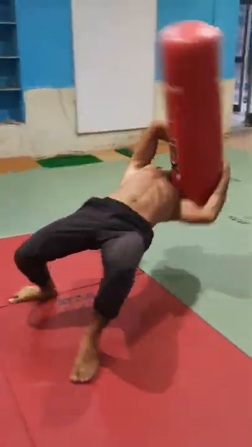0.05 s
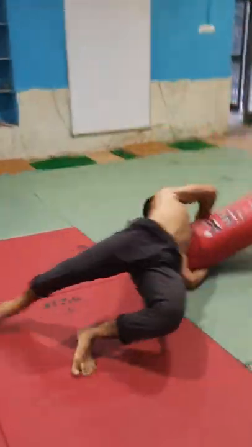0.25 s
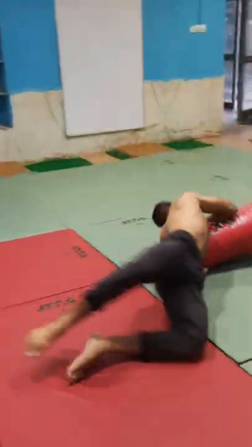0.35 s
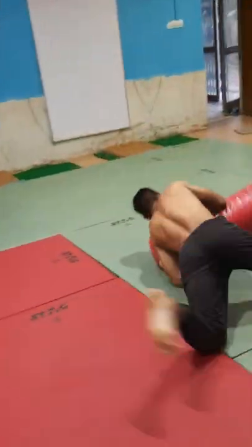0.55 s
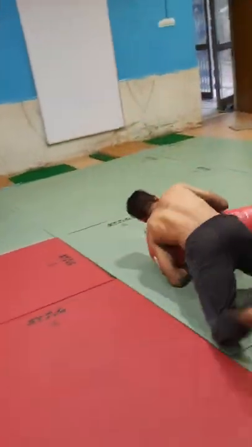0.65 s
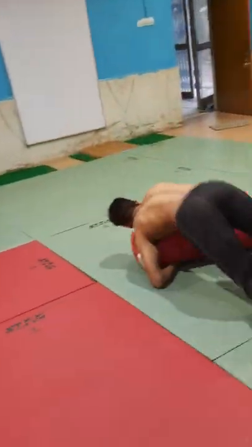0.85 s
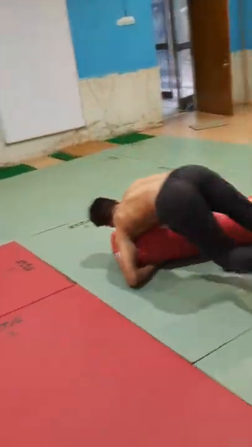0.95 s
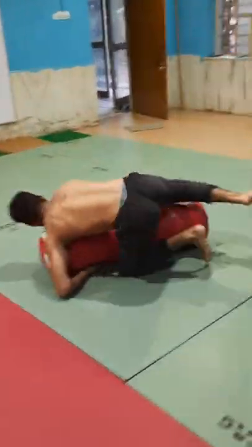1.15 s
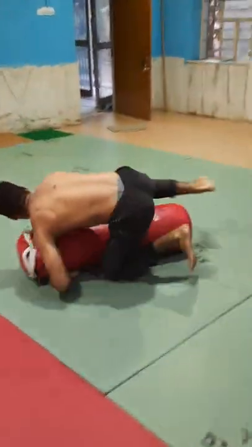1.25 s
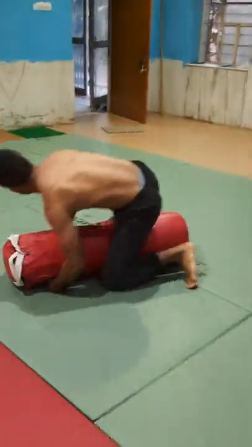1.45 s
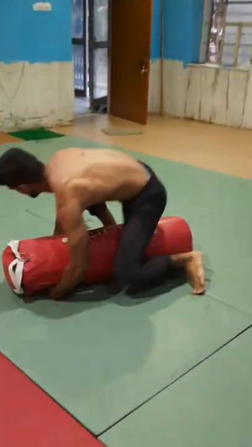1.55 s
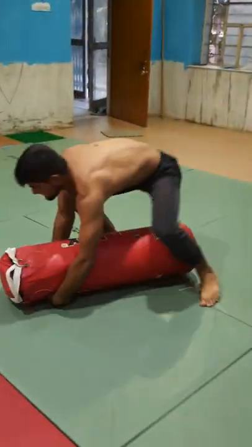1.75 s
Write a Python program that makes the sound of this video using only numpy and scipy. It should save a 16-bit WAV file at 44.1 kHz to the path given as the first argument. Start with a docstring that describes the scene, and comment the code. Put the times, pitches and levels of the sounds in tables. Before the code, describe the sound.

A heavy vinyl bag and body slam onto padded mats, booming through an echoing gym

```python
"""Bag and body landing on gym mats

A wrestler throws a heavy vinyl bag onto padded mats and lands with it, in a bare, echoing gym.
Thuds are pressure pulses with damped ringing; slaps and scuffs are shaped, coloured noise; cracks are spikes.
Decaying sines form the low resonances that boom on, and random reflections form the echo.
Knees and feet then knock and scuff on the mat as he rolls over the bag, above steady room noise."""
import sys
import numpy as np
from scipy import signal
from scipy.fft import rfft, irfft
from scipy.io import wavfile

SR = 44100
rng = np.random.default_rng(int(sys.argv[2]) if len(sys.argv) > 2 else 0)


def bounce(signal):
    """Save signal as a 16-bit WAV file at the path given by the first command-line argument."""
    frames = np.transpose(np.atleast_2d(signal))
    limited = np.clip(frames, -1, 1)
    pcm = np.round(limited * 32767).astype(np.int16)
    wavfile.write(sys.argv[1], SR, pcm)


N = 79380
TIME = np.arange(N) / SR  # s
HZ = np.fft.rfftfreq(2 * N, 1 / SR)

# Blows on the mat. Each row: pulse centre in seconds, relative level in dB, nominal pitch in Hz,
# ring level in dB relative to the pulse.
BLOWS = [(0.2349, -13.5, 280, -10.5), (0.2744, -7.5, 274, -5), (.290, -8, 284, -3), (0.3, -10, 127, -26),
         (0.327, -10, 199, -11), (.3375, -2, 187.4, -10), (.357, -8.5, 254, -8), (.398, -10, 181.5, -9),
         (.410, -14, 103, -36), (.446, -12, 206, -9), (.698, -16, 221, -13.5), (.708, -13, 192.3, -10),
         (0.861, -19, 148, -19), (0.875, -17, 209, -11.5), (0.928, -22, 65.6, -16), (1.127, -34, 64, -10.5),
         (1.355, -29, 138, -22), (1.402, -31, 197, -7), (1.574, -28.5, 166, -1), (1.600, -27.5, 393, -13)]
THUD_CYCLES = 0.38  # pulse width in periods of the nominal pitch
THUD_RING_S, THUD_RING_RATIO = 0.012, 1.195  # decay; ring frequency over nominal pitch
THUD_EARLY_DB, THUD_ROOM_DB = -8, -5

# Bass resonances of the room. Each row: frequency in Hz, relative level in dB, 60 dB decay time in seconds.
ROOM_MODES = [(50.75, -35.1, 2.99), (59.51, -23.9, 5.0), (61.95, -29.8, 2.48), (67.43, -30.3, 3.0),
              (71.05, -28.1, 4.83), (78.19, -25.8, 3.58), (82.96, -34.8, 3.25), (88.02, -23.2, 3.24),
              (90.86, -30.6, 2.9), (101.18, -23.9, 2.37), (110.12, -25.1, 3.43), (114.04, -28.4, 2.2),
              (119.95, -28.5, 2.32), (135.81, -33.4, 2.17)]
LANDING_S, BOOM_RISE_S, BOOM_DB = 0.3375, 0.025, 1

# Vinyl and skin slapping the mat. Each row: start in seconds, relative level in dB, decay in seconds,
# treble tilt in dB per octave.
SLAP_EVENTS = [(0.2705, -25, 0.0088, 9.5), (0.285, -23.5, 0.013, -4), (.304, -22, 0.02, -4),
               (.325, -14, 0.0018, 0.5), (0.336, -20.5, 0.021, -2.5), (0.355, -20, 0.013, 0),
               (0.369, -17.5, .011, -0.44), (.381, -17.5, 0.0049, -1.8), (.394, -21.5, 0.021, -2),
               (.6935, -27, 0.0035, 8.5)]
# Spectrum of a slap before its tilt. Each row: frequency in Hz, relative level in dB.
SLAP_SPECTRUM = [(80, -29), (300, -0.5), (480, 5.5), (650, -4), (900, 0.5), (1150, -2.5), (1400, -1.5),
                 (2200, -1), (2750, -9), (3600, -5), (4900, -8.5), (8500, -15), (9800, -19.5),
                 (16000, -17.5)]
SLAP_RISE_S, SLAP_GRAIN_DB = 0.00085, 4
SLAP_DIRECT_DB, SLAP_EARLY_DB, SLAP_ROOM_DB = 1, -1, 2.5

# Flat surfaces trapping air with a sharp crack. Each row: start in seconds, relative level in dB,
# width in seconds.
AIR_CRACKS = [(.3265, -5, .00016), (.3823, -8, .00009)]
CRACK_EARLY_DB = -6

# Cloth, skin and bag sliding. Each row: start in seconds, rise in seconds, decay in seconds,
# relative level in dB, treble tilt in dB per octave.
SLIDES = [(.11, 0.051, 0.21, -42, -1.5), (0.243, 0.018, 0.068, -30.5, -0.5), (.325, 0.034, 0.037, -36, 6.5),
          (0.691, 0.028, 0.047, -35.5, -1.5), (0.859, 0.032, 0.016, -48.5, 3),
          (1.121, 0.05, 0.021, -64, 15), (1.54, 0.018, 0.22, -44.5, -5)]
# Spectrum of a scuff before its tilt. Each row: frequency in Hz, relative level in dB.
SCUFF_SPECTRUM = [(80, -12), (300, -7.5), (700, 9), (2200, 1.5), (4500, -3.5), (8600, -2), (9600, -6.5),
                  (13000, 0), (16000, -13)]
SCUFF_GRAIN_DB, SCUFF_LEFT_DB = 1.1, 1
SCUFF_DIRECT_DB, SCUFF_ROOM_DB = -1.5, 3

# Reverberation time of the gym. Each row: frequency in Hz, 60 dB decay time in seconds.
REVERB_TIME = [(60, 1.14), (150, 0.94), (300, 1.2), (700, 1.91), (2000, 1.81), (4000, 1.29), (8000, 1.03),
               (15000, 0.38)]
# Left-right likeness of diffuse sound. Each row: frequency in Hz, correlation from -1 to 1.
CORRELATION = [(60, 0.88), (180, 1), (350, 0.81), (700, 0.48), (1300, -0.16), (3000, -0.14), (15000, 0.33)]
ROOM_BUILD_S, EARLY_S = 0.0054, 0.019  # time constants of the echo's growth and the early decay
REFLECTIONS_PER_S = 2000
ECHO_LOW_CUT_HZ = 85  # below this the room rings in separate resonances

# Spectrum of the steady room noise. Each row: frequency in Hz, relative level in dB.
AIR_SPECTRUM = [(30, -9), (70, 0), (170, 0.5), (330, -5.5), (550, -8), (1100, -12.5), (2200, -17.5),
                (3200, -24), (5000, -34), (8600, -36.5), (9600, -44.5), (15500, -46)]
# Spectrum of the echo of earlier movement. Each row: frequency in Hz, relative level in dB.
EARLIER_SPECTRUM = [(30, -30), (55, 6), (85, -3), (140, 6.5), (220, -5), (460, 1), (750, -8), (2300, -12),
                    (3200, -21.5), (5000, -29.5), (8600, -31), (10500, -35.5), (15500, -32.5)]
AIR_DB, EARLIER_DB, EARLIER_FADE_DB_PER_S = -40, -33.5, -12

LEFT_DB, RIGHT_DB = -1.42, 0.62
CEILING, EDGE_HZ = 0.92, 15950  # peak limit as a fraction of full scale; upper band edge


def amp(db):
    """Level in decibels expressed as an amplitude ratio."""
    return 10 ** (np.asarray(db) / 20)


def unit(x):
    """Normalisation to a root-mean-square value of 1."""
    return x / np.sqrt(np.mean(x ** 2) + 1e-20)


def unit_energy(response):
    """Normalisation of a two-channel response to a mean energy of 1 per channel."""
    return response / np.sqrt(np.sum(response ** 2) / 2)


def read(points, hz):
    """Linear interpolation of a table on a logarithmic frequency axis."""
    f, value = np.transpose(points)
    return np.interp(np.log(hz + 1), np.log(f + 1), value)


def convolve(x, response):
    """Linear superposition: every instant of x launches the two-channel response."""
    return signal.fftconvolve(np.atleast_2d(x), response, axes=1)[:, :N]


def diffuse(pair, gain=1):
    """Partial coherence: sum and difference of two unrelated signals set the left-right correlation."""
    a, b = rfft(pair, 2 * N)
    same = np.clip(read(CORRELATION, HZ), -1, 1)
    mid = a * np.sqrt((1 + same) / 2)
    side = b * np.sqrt((1 - same) / 2)
    spectrum = np.array([mid + side, mid - side]) * gain
    return unit(irfft(spectrum)[:, :N])


def friction(colour, tilt_db, grain_db):
    """Irregular surface contact: noise in short grains of uneven size, with a tilted spectrum."""
    grain = 32  # samples
    excess = np.minimum(rng.exponential(1, N // grain + 1), 4)
    size = amp(grain_db * excess).repeat(grain)[:N]
    octaves = np.log2(np.maximum(HZ, 300) / 2000)
    gain = amp(read(colour, HZ) + tilt_db * octaves)
    return diffuse(rng.standard_normal((2, N)) * size, gain)


def taps():
    """Dense reflection: sparse impulses of random sign, without the deep bass."""
    above = HZ ** 3 / np.hypot(HZ ** 3, ECHO_LOW_CUT_HZ ** 3)
    signs = rng.choice([-1., 1.], (2, N))
    present = rng.random((2, N)) < REFLECTIONS_PER_S / SR
    return diffuse(signs * present, above)


def early():
    """First reflections from floor and nearby wall: delayed arrivals with exponential decay."""
    return unit_energy(taps() * np.exp(-TIME / EARLY_S) * (TIME > .002))


def hall():
    """Reverberation: the gym's echo builds up while each frequency band decays at its own rate."""
    hz, t, bands = signal.stft(taps(), SR, nperseg=512)
    decay = amp(-60 * t / read(REVERB_TIME, hz)[:, None])
    tail = signal.istft(bands * decay, SR, nperseg=512)[1][:, :N]
    return unit_energy(tail * (1 - np.exp(-TIME / ROOM_BUILD_S)))


def thuds():
    """Impact on a soft layer: a smooth pressure pulse and a short, damped ring of the padding."""
    dry = np.zeros(N)
    for s, db, hz, ring_db in BLOWS:
        u = (TIME - s) * hz / THUD_CYCLES
        t = np.maximum(TIME - s, 0)
        push = (1 - 2 * u ** 2) * np.exp(-u ** 2)
        ring = np.sin(2 * np.pi * hz * THUD_RING_RATIO * t) * np.exp(-t / THUD_RING_S)
        dry += amp(db) * (push - amp(ring_db) * ring)
    room = amp(THUD_EARLY_DB) * early() + amp(THUD_ROOM_DB) * hall()
    return dry + convolve(dry, room)


def boom():
    """Modal resonance: the landing sets the room's bass modes ringing, and they beat together."""
    t = np.maximum(TIME - LANDING_S, 0)
    ring = np.zeros(N)
    for hz, db, t60 in ROOM_MODES:
        ring += amp(db - 60 * t / t60) * np.sin(2 * np.pi * hz * t)
    return amp(BOOM_DB) * ring * (1 - np.exp(-t / BOOM_RISE_S))


def slaps():
    """Abrupt contact: fast-rising, decaying noise as surfaces meet, thrown back by the walls."""
    dry = np.zeros((2, N))
    for s, db, decay, tilt in SLAP_EVENTS:
        rise = np.clip((TIME - s) / SLAP_RISE_S, 0, 1)
        fall = np.exp(-np.maximum(TIME - s - SLAP_RISE_S, 0) / decay)
        dry += amp(db) * rise * fall * friction(SLAP_SPECTRUM, tilt, SLAP_GRAIN_DB)
    room = amp(SLAP_EARLY_DB) * early() + amp(SLAP_ROOM_DB) * hall()
    return amp(SLAP_DIRECT_DB) * dry + convolve(dry, room)


def cracks():
    """Sudden expulsion of trapped air: a steep spike, a shallow rebound and first reflections."""
    dry = np.zeros(N)
    for s, db, width in AIR_CRACKS:
        u = (np.arange(N) - round(s * SR)) / SR / width
        dry -= amp(db) * (u >= 0) * (1 - u) * np.exp(-abs(u))
    return dry + amp(CRACK_EARLY_DB) * convolve(dry, early())


def scuffs():
    """Sliding friction: strokes of grainy noise that swell and fade, with the gym's echo."""
    dry = np.zeros((2, N))
    for s, rise_s, decay, db, tilt in SLIDES:
        rise = np.clip((TIME - s) / rise_s, 0, 1) ** 2
        fall = np.exp(-np.maximum(TIME - s - rise_s, 0) / decay)
        dry += amp(db) * rise * fall * friction(SCUFF_SPECTRUM, tilt, SCUFF_GRAIN_DB)
    return amp(SCUFF_DIRECT_DB) * dry + amp(SCUFF_ROOM_DB) * convolve(dry, hall())


def air():
    """Diffuse background: steady room noise and the exponentially fading echo of earlier movement."""
    steady = diffuse(rng.standard_normal((2, N)), amp(read(AIR_SPECTRUM, HZ)))
    echo = diffuse(rng.standard_normal((2, N)), amp(read(EARLIER_SPECTRUM, HZ)))
    return amp(AIR_DB) * steady + amp(EARLIER_DB + EARLIER_FADE_DB_PER_S * TIME) * echo


def scene():
    """Level difference places the landing a little to the right, the scuffing nearer the middle."""
    landing = thuds() + boom() + slaps() + cracks()
    sliding = scuffs() * amp([[SCUFF_LEFT_DB], [0]])
    return (landing + sliding + air()) * amp([[LEFT_DB], [RIGHT_DB]])


def record(dry):
    """Saturation and band limiting: the loudest peaks are rounded off, then the top is filtered."""
    rounded = dry / (1 + (dry / CEILING) ** 8) ** (1 / 8)
    low_pass = signal.firwin(511, EDGE_HZ, window=("kaiser", 9), fs=SR)
    return signal.oaconvolve(rounded, low_pass[None], "same")


dry = scene()
out = record(dry)
bounce(out)
```